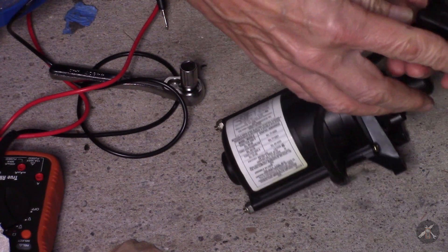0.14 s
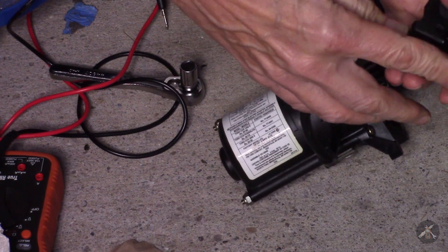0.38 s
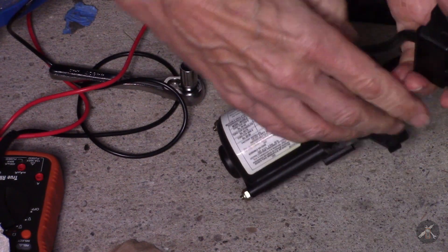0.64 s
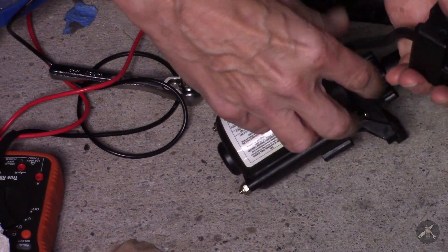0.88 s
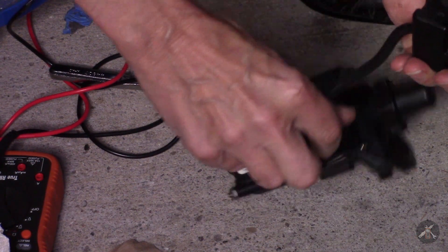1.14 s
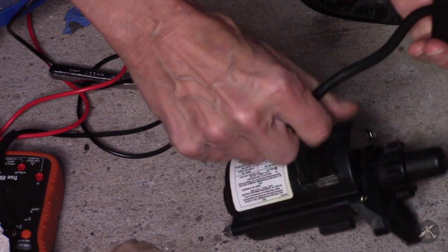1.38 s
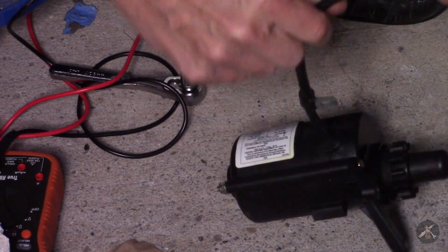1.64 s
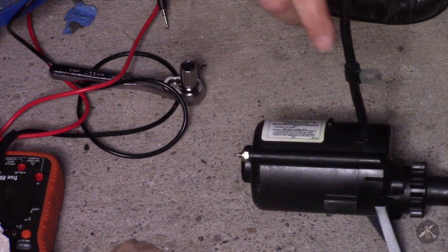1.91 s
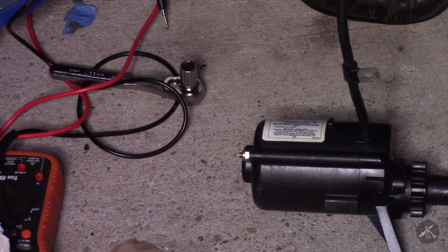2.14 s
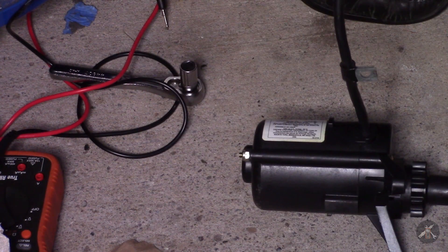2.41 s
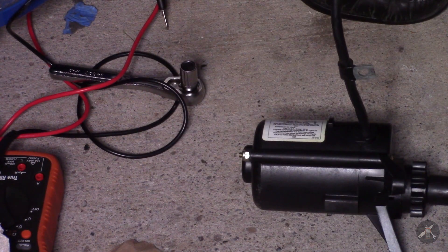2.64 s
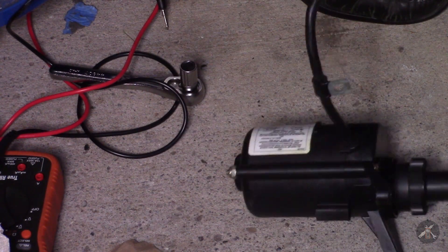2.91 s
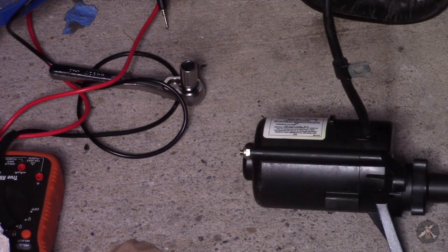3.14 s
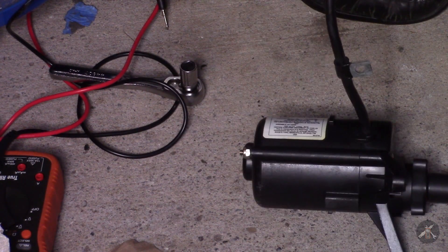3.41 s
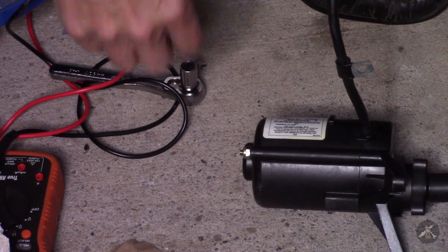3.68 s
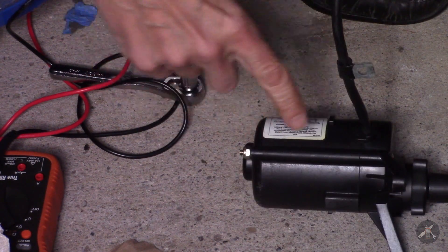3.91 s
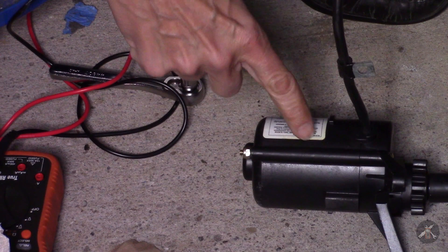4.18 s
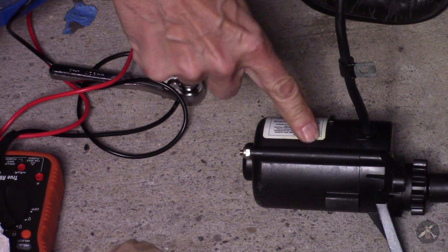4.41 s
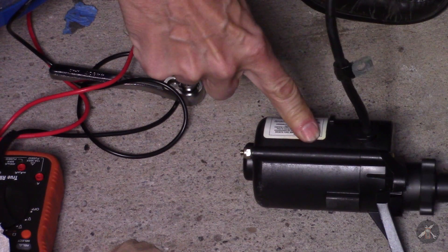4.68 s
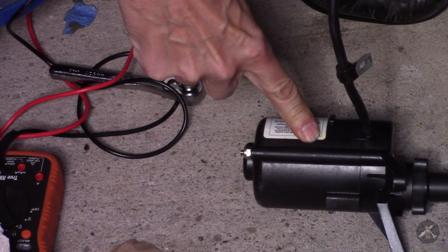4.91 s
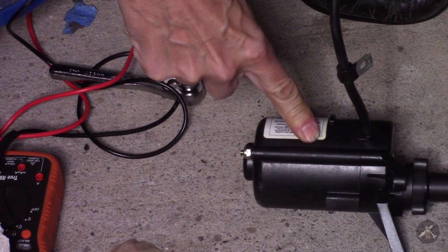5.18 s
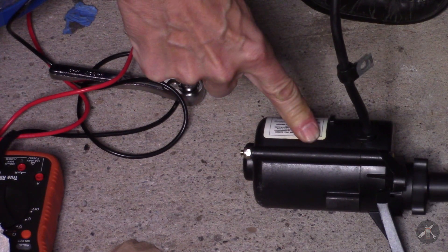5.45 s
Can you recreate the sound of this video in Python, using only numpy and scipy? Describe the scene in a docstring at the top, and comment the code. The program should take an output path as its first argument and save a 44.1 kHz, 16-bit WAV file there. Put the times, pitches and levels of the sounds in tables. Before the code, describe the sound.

Faint ticks and hard plastic knocks on a garage floor, then two abrupt geared motor whirs, each coasting downward, over hissy room air.

```python
"""Hand-held camera microphone close to a concrete garage floor: hiss and rumble of the air from the start.
A switch box and cable tick in the hands (short rough rings), then a small geared starter motor is dragged
and dropped (noise bursts and grit ticks coloured by its plastic housing). The push switch then kicks it
twice: it spins up at once and coasts down, gears and brushes rattling (clicks), the shaft whining (sines).
The small hard room answers (sparse reflections); the gain control lowers the background after loud sounds."""
import sys
import numpy as np
from scipy import signal
from scipy.fft import rfft, irfft
from scipy.io import wavfile
from scipy.ndimage import uniform_filter1d

SR = 44100
rng = np.random.default_rng(int(sys.argv[2]) if len(sys.argv) > 2 else 0)


def undo_db(level):
    """Turn decibels back into plain size, where 20 dB means ten times bigger."""
    steps = np.asarray(level, float) / 20
    return 10 ** steps


def output_pcm(signal):
    """Save a mono or channel-first signal as 16-bit PCM at the path in sys.argv[1].

    Samples are clipped to [-1, 1] before scaling.
    """
    pcm = np.clip(np.atleast_2d(signal).T, -1, 1) * 32767
    wavfile.write(sys.argv[1], SR, np.round(pcm).astype(np.int16))


N = 245063  # samples

# broad colour of the struck or scraped plastic housing: f/Hz, level/dB
SHELL = [(59, -22), (100, -13), (231, -2.5), (279, -9.5), (407, -3), (443, -9), (674, -9), (983, -5.5),
         (2050, 0), (3180, -4.5), (4350, -6.5), (5040, -9.5), (7200, -11), (9660, -16), (15000, -38.5)]
# resonances the struck or scraped housing rings with: f/Hz, width/Hz, level above the broad colour/dB
RING = [(1160, 200, 1), (1920, 200, 3), (2410, 260, 2.5), (2800, 160, 1.5), (3560, 200, 1.5),
        (4250, 260, 4.5), (9400, 300, 2)]


def evened(x):
    """Scales to rms 1."""
    return x / np.sqrt(np.mean(x ** 2) + 1e-20)


def read(points, hz):
    """A table of values against frequency or speed, joined on a log axis."""
    f, value = np.transpose(points)
    return np.interp(np.log(hz + 1), np.log(f + 1), value)


def add(mix, s, sound):
    """Mixes a sound in at time s (seconds)."""
    part = mix[round(s * SR):][:len(sound)]
    part += sound[:len(part)]


def coloured(x, colour, modes):
    """Causal (minimum-phase) filter: a broad colour with narrow resonances on top."""
    hz = np.fft.rfftfreq(8192, 1 / SR)
    broad_db = np.maximum(read(colour, hz), -90)
    db = broad_db + sum(d / (1 + (2 * (hz - f) / w) ** 2) for f, w, d in modes)
    log_gain = np.log(undo_db(np.r_[db, db[-2:0:-1]]))
    taps = np.fft.ifft(np.exp(np.conj(signal.hilbert(log_gain)))).real[:4096]
    return signal.oaconvolve(x, taps)[:len(x)]


def grains(per_s, spread_db):
    """Random clicks of either sign at a changing rate; a few are large."""
    chance, size, sign = rng.random((len(per_s), 3)).T
    height = undo_db(-spread_db * np.log(1 - .99 * size))
    return (chance < per_s / SR) * height * np.sign(sign - .5)


def flutter(size, span):
    """Slow chance of rms 1 that changes over about span samples."""
    smooth = uniform_filter1d(rng.standard_normal(size), int(span))
    return evened(uniform_filter1d(smooth, int(span)))


def air():
    """Low room rumble over microphone hiss; the rumble is shared by both sides."""
    # background air and microphone noise: f/Hz, level/dB
    air_colour = [(12, -36.5), (20, -3.5), (110, -3.5), (284, -9), (603, -14.5), (843, -16), (942, -19.5),
                  (1390, -20.5), (1600, -19.5), (1740, -23), (15800, -30)]
    # left-right likeness: f/Hz, correlation
    likeness = [(60, 0.89), (180, 0.91), (550, 0.37), (1650, 0.32), (4970, 0.03), (15000, 0.02)]
    frames, hz = N // 512 + 5, np.fft.rfftfreq(2048, 1 / SR)
    a, b, c, d = rng.standard_normal((frames, 1025, 4)).T
    same = np.clip(read(likeness, hz), -1, 1)[:, None]
    left = a + 1j * b
    right = same * left + np.sqrt(1 - same ** 2) * (c + 1j * d)
    z = np.array([left, right]) * undo_db(read(air_colour, hz))[:, None]
    noise = signal.istft(z, nperseg=2048, noverlap=1536)[1][:, :N]
    return undo_db(-45) * evened(noise)


def tick(hz, t60, noise_share):
    """A soft ring at one pitch, slightly rough, with a share of broad noisy knock above the ring."""
    t, noise_share = np.arange(SR // 8) / SR, np.clip(noise_share, 0, 1)
    shape = undo_db(-60 * t / t60) * np.minimum(t / 0.0027, 1)
    broad = signal.iirpeak(1.9 * hz, 1.2, SR)
    knock = signal.lfilter(*broad, rng.standard_normal(len(t)))
    knock = evened(signal.lfilter(*broad, knock))
    tone = np.sin(2 * np.pi * hz * t) * undo_db(5.0 * flutter(len(t), 2 * SR / hz))
    ring = shape * ((1 - noise_share) * tone + noise_share * knock)
    return ring / abs(ring).max()


def garage(x):
    """Three tails of sparse reflections, each band dying at its own speed, fed in quick rotation,
    so the echo is diffuse and evenly coloured."""
    # decay of the hard room: f/Hz, t60/s
    room_decay = [(250, 0.38), (700, 0.66), (1800, 0.44), (4600, 0.44), (10000, 0.3)]
    taps = np.zeros((6, SR))
    # one reflection in every 20 samples, at a random place
    at = np.arange(200, SR - 20, 20) + rng.integers(0, 20, (6, (SR - 201) // 20))
    np.put_along_axis(taps, at, rng.choice([-1., 1.], at.shape), 1)
    taps = taps.reshape(3, 2, SR)  # tail, side, time
    taps = taps + 0.39 * taps[:, ::-1]  # close microphones hear partly the same walls
    hz, t, z = signal.stft(taps, SR, nperseg=256)
    tails = signal.istft(z * undo_db(-60 * t / read(room_decay, hz)[:, None]), SR, nperseg=256)[1]
    tails = tails / np.linalg.norm(tails[0, 0])
    turn = np.arange(N) / SR / .2 + np.arange(3)[:, None] / 3  # in half turns of 0.2 s
    feeds = np.sqrt(2 / 3) * np.sin(np.pi * turn) * x
    return signal.fftconvolve(feeds[:, None], tails, axes=2).sum(0)[:, :N]


def microphone(heard):
    """Two close ports: level and phase differ from left to right with frequency."""
    # left over right: f/Hz, level/dB
    port_lean = [(60, -1.0), (150, -1.5), (380, -2.0), (950, 1.5), (2380, -1.0), (5980, -1.0), (15000, 0.0)]
    # floor echo between the ports: f/Hz, phase by which left leads/rad
    port_lead = [(250, 0.1), (600, 0.78), (850, 0.11), (1120, -1.2), (1600, -0.37)]
    hz = np.fft.rfftfreq(N, 1 / SR)
    level = undo_db(np.outer([.5, -.5], read(port_lean, hz)))
    phase = np.exp(1j * np.outer([.5, -.5], read(port_lead, hz)))
    return irfft(rfft(heard) * level * phase, N)


def shell(bright_db, t60):
    """One blow: a sharp jolt and a dying rattle, coloured by the housing."""
    t = np.arange(SR // 6) / SR
    decay = undo_db(-60 * t / t60) + 0.54 * undo_db(-60 * t / 0.0019)
    jolt = rng.standard_normal(len(t)) * decay * np.minimum(t / .0011, 1)
    tilted = [(hz, db + bright_db * np.log2(hz / 2400)) for hz, db in SHELL]
    blow = coloured(jolt, tilted, RING)
    return blow / abs(blow).max()


def drag(length, top_db):
    """Grit ticks the housing densely while it slides, loudest in mid-stroke."""
    t = np.arange(0, length, 1 / SR)
    grit = coloured(grains(np.full(len(t), 1500.), spread_db=3.0), SHELL, RING)
    return undo_db(top_db) * evened(grit) * np.sin(np.pi * t / length) ** .8


def shaft_speed(t, on, rest):
    """Current pulls the rotor toward free speed; after release bearing friction and windage brake it to rest."""
    free_hz, spin_up_s = 410, .058
    bearing_hz_per_s, windage_per_hz = 178.4, .001975
    pull = free_hz * (1 - np.exp(-(t - on) / spin_up_s))
    left = np.clip(np.sqrt(bearing_hz_per_s * windage_per_hz) * (rest - t), 0, 1.5)
    coast = np.sqrt(bearing_hz_per_s / windage_per_hz) * np.tan(left)
    return np.minimum(pull, coast), pull < coast


def surge(t):
    """Each catch of the pinion lifts the level quickly and lets it sink back, in dB."""
    # the pinion catches and the rattle surges: t/s, level/dB, fade/s
    catches = [(2.882, 5.5, .01), (2.91, 4.5, .02), (2.94, 3, .015), (3.92, 3, .02), (4.585, 3.5, .02),
               (4.94, 1, .04), (5.11, 3.5, .04), (5.32, 2.5, .08)]
    rise_s = .008
    return sum(db * np.exp(np.minimum((t - s) / rise_s, (s - t) / fade)) for s, db, fade in catches)


def rattle_levels(t, shaft_hz, powered, level_db):
    """Clatter, hiss and fizz in dB: they follow shaft speed, load and the catches of the pinion."""
    # rattle against shaft speed: shaft f/Hz, gear clatter level/dB, brush hiss level/dB, brush fizz level/dB
    by_speed = [(0, -43, -54, -56), (12.1, -30.5, -46, -40), (40, -25, -33, -36), (87.5, -23.5, -26.5, -32),
                (150, -22, -19.5, -25.5), (250, -19.5, -21, -26.5), (370, -18.5, -21, -25)]
    # added while current flows: clatter level/dB, hiss level/dB, fizz level/dB
    load_lift = (0, 2.5, 2)
    # share of a surge taken by: clatter, hiss, fizz [ratio]
    surge_share = (1.0, .6, 0.7)
    current = uniform_filter1d(powered * 1., size=1200)
    coasting_hz = np.where(powered, shaft_hz.max(), shaft_hz)  # under power the gears rattle as at top speed
    speed, *columns = np.transpose(by_speed)
    return [level_db + read(np.c_[speed, column], coasting_hz) + load_db * current + share * surge(t)
            for column, load_db, share in zip(columns, load_lift, surge_share)]


def rattle(shaft_hz, turns, levels_db):
    """Gear clatter, brush hiss and fizz: shared jolts and separate clicks, through the housing."""
    # broad colours of gear clatter, brush hiss and brush fizz: f/Hz, level/dB
    clatter_colour = [(88, -50), (150, -22), (231, -17.5), (333, -20.5), (512, -13.5), (665, -5.5),
                      (933, -5.5), (1140, 2.5), (1230, 0.5), (2240, 0.5), (3400, -9.5), (4420, -21),
                      (7480, -120)]
    hiss_colour = [(1820, -40.5), (3100, -1), (3400, -10), (3590, 3.5), (3780, 1), (4920, -7.5), (5890, -5),
                   (6600, -31), (8580, -34.5), (14500, -120)]
    fizz_colour = [(3710, -28), (6300, -3.5), (7320, 3), (8340, -4.5), (11000, -8), (11700, -12),
                   (12700, -23), (13700, -23.5), (15800, -34.5)]
    # housing resonances under the running motor: f/Hz, width/Hz, level above the broad colour/dB
    housing_modes = [(668, 30, 3.5), (1162, 4.8, 5.5), (1426, 50, -0.5), (1737, 43, 2.5), (1790, 110, 1),
                     (1926, 140, 3.5), (2210, 96, 4), (2413, 57, 5.5), (2522, 99, 1), (2860, 140, 1.5),
                     (3685, 127, 1.5), (3840, 120, 3.5), (4420, 100, 4.5), (6030, 170, 3.5),
                     (7380, 300, -4)]
    wobble = 1 + 0.1 * np.cos(2 * np.pi * turns)  # the rotor runs a little out of true
    bar_pulses = 1 + .4 * np.cos(2 * np.pi * 8 * turns)
    jolts = evened(grains(600 + 6 * shaft_hz, spread_db=2.0))  # gear lash shakes every part at once
    noise = np.zeros(len(turns))
    for db, colour in zip(levels_db, (clatter_colour, hiss_colour, fizz_colour)):
        clicks = evened(grains(3000 + 40 * shaft_hz, spread_db=2.0)) * bar_pulses
        noise += undo_db(db) * evened(coloured((0.61 * jolts + clicks) * wobble, colour, housing_modes))
    return noise * undo_db(0.87 * flutter(len(turns), 700))  # the loose pinion chatters in lumps


def shaft_whine(shaft_hz, turns):
    """Sines at multiples of shaft speed, wavering in level, as strong as housing and floor radiate them."""
    # shaft orders from unbalance, then the eight commutator bars and their multiples: multiple of shaft speed
    orders = [1, 2, 3, 4, 5, 8, 16, 24]
    # for each order: level against the clatter/dB, level gained per octave of speed/dB
    order_levels = [(-13, 2.5), (-16, 3), (-17.5, 7), (-18.5, 11.5), (-25, 8.5), (-14, 3), (-25.5, 3),
                    (-15.5, 0.5)]
    # how well housing and floor radiate a tone: f/Hz, level/dB
    radiated = [(60, -49.5), (120, -16), (165, -14.5), (200, -2.5), (260, -3), (300, -2), (345, -5),
                (375, -0.5), (430, -0.5), (540, -4), (660, 7.5), (800, 3.5), (950, 3.5), (1140, 11),
                (1400, 0), (2500, 3.5), (6000, -18.5)]
    octaves = np.log2(np.maximum(shaft_hz, 10) / 250)
    tones = np.zeros(len(turns))
    for k, (db, slope_db) in zip(orders, order_levels):
        waver_db = 2.6 * flutter(len(turns), 1400)
        tone_db = db + slope_db * octaves + read(radiated, k * shaft_hz) + waver_db
        tones += undo_db(tone_db) * np.sin(2 * np.pi * k * turns)
    return tones


def motor(on, bite, rest, level_db):
    """One kick of the starter: its rattle and, apart from it, its whine; both slow as the rotor coasts."""
    t = np.arange(bite, min(rest + .04, N / SR), 1 / SR)
    shaft_hz, powered = shaft_speed(t, on, rest)
    turns = np.cumsum(shaft_hz) / SR
    levels_db = rattle_levels(t, shaft_hz, powered, level_db)
    bite_s = .008  # the rattle swells as the pinion bites
    ends = np.clip((t - bite) / bite_s, 0, 1) * np.clip((rest + 0.043 - t) / 0.046, 0, 1)
    running = np.clip((t - bite) / 0.042, 0, 1) * np.clip((rest - t) / 0.05, 0, 1)
    clatter_gain = undo_db(uniform_filter1d(levels_db[0], 4000))
    return rattle(shaft_hz, turns, levels_db) * ends, shaft_whine(shaft_hz, turns) * running * clatter_gain


def scene():
    """Everything near the floor, its room and the background."""
    # switch box and cable in the hands: t/s, relative peak level/dB, ring f/Hz, t60/s, noise share/0-1
    hand_ticks = [(0.268, -39, 566, 0.089, 0.34), (0.51, -49, 580, 0.043, 0.6),
                  (0.619, -41.5, 570, 0.072, 0.32), (0.983, -45, 1290, 0.033, 0.5),
                  (2.808, -48, 840, .03, 0.7), (2.849, -24, 1890, .036, 0.7),
                  (2.858, -17.5, 1945, 0.039, 0.53), (4.346, -39.5, 5670, .03, 0.2),
                  (4.515, -42, 1500, 0.03, .8), (4.537, -21.5, 1800, 0.037, 0.6)]
    # housing knocks on the floor: t/s, relative peak level/dB, brightness/dB per octave, t60/s
    floor_knocks = [(1.156, -34.5, -3.5, 0.067), (1.213, -24, -0.5, 0.078), (1.27, -15, -1, 0.045),
                    (1.315, -25, 0, 0.04), (1.397, -24.5, 2.5, 0.05), (1.42, -22, -2.5, 0.019),
                    (1.445, -32, -1.5, 0.028), (1.466, -28, 0.5, 0.04), (1.746, -37, -4.5, 0.12),
                    (1.836, -35, -6, 0.088), (1.859, -26.5, 0.5, 0.059), (1.874, -8.5, 0, 0.025),
                    (1.892, -24, -1.5, 0.045), (1.98, -9.5, -1, 0.04), (2, -14.5, -0.5, 0.044),
                    (2.872, -18, 2, 0.03), (2.88, -16, -2.5, 0.038), (4.546, -14.5, -2, 0.0414)]
    # housing dragged over grit: start t/s, length/s, relative top level/dB
    floor_drags = [(1.279, 0.24, -41.5)]
    # presses of the switch: power on t/s, pinion bites t/s, rotor at rest t/s
    presses = [(2.866, 2.872, 4.085), (4.542, 4.545, 6.195)]
    # for each press, loose on the floor, then pressed down by a finger: level/dB
    press_levels = [-0.5, 2]
    near, tones = np.zeros((2, N))
    for s, db, *ring in hand_ticks:
        add(near, s, undo_db(db) * tick(*ring))
    for s, db, bright_db, t60 in floor_knocks:
        add(near, s, undo_db(db) * shell(bright_db, t60))
    for s, length, top_db in floor_drags:
        add(near, s, drag(length, top_db))
    for (on, bite, rest), level_db in zip(presses, press_levels):
        rattling, whine = motor(on, bite, rest, level_db)
        add(near, bite, rattling)
        add(tones, bite, whine)
    room = undo_db(-5.5) * garage(near + 0.89 * tones)  # the whine feeds the room a little less than the rattle
    return undo_db(7.5) * microphone(near + tones + room) + air()


def top_cut(x):
    """Nothing passes above the cut-off."""
    return signal.sosfilt(signal.butter(12, 15980, fs=SR, output="sos"), x)


def record(dry):
    """Gain control turns down for long loud sounds and recovers slowly; peaks clip; the top treble is cut."""
    power_db = 10 * np.log10(abs(uniform_filter1d((dry ** 2).mean(0), 5000)) + 1e-12)
    fall = np.arange(N) * 0.84 / SR  # the held level sinks by 0.84 dB a second
    held_db = np.maximum.accumulate(power_db + fall) - fall
    over_db = np.maximum(held_db + 18.5, 0)
    levelled = dry / undo_db(0.53 * over_db)
    edge = signal.firwin(255, 15900, fs=SR)[None]
    mix = signal.oaconvolve(np.clip(levelled, -1, 1), edge, "same")
    return top_cut(mix)


dry = scene()
out = record(dry)
output_pcm(out)
```